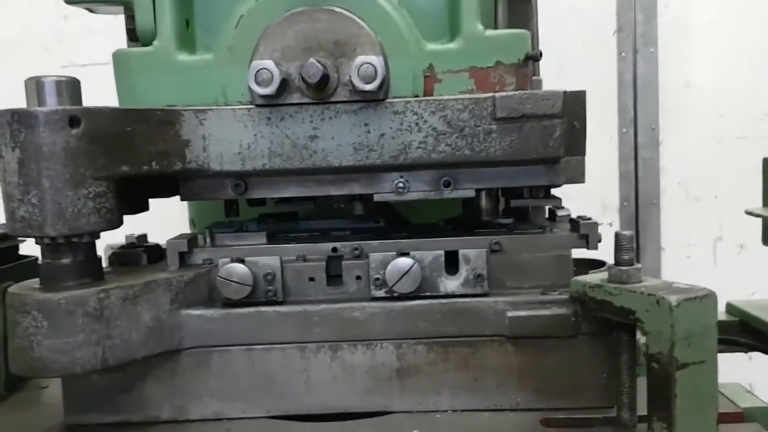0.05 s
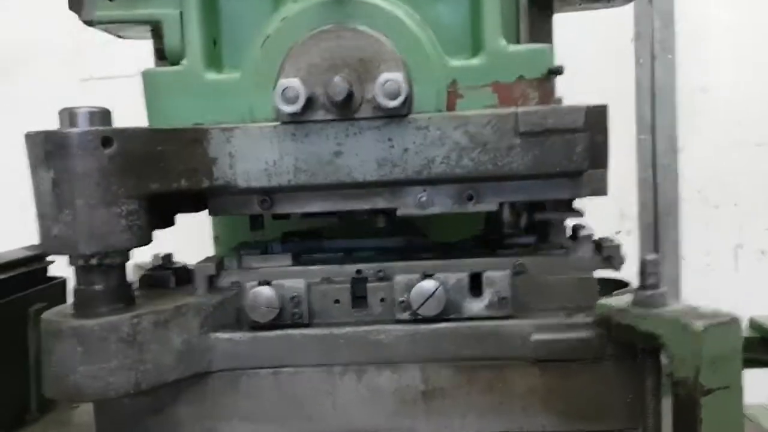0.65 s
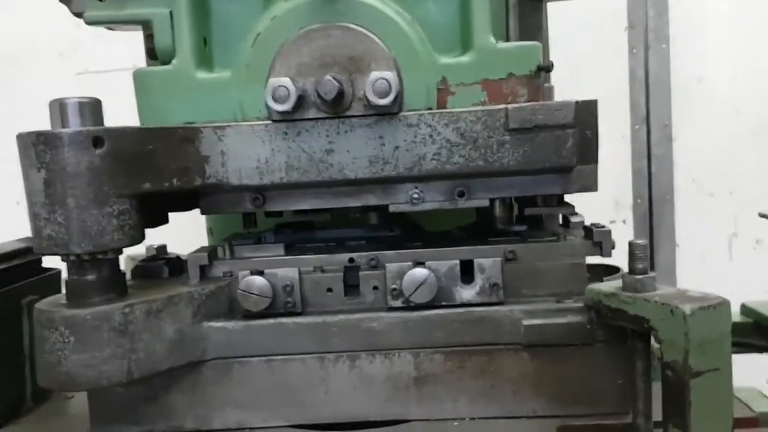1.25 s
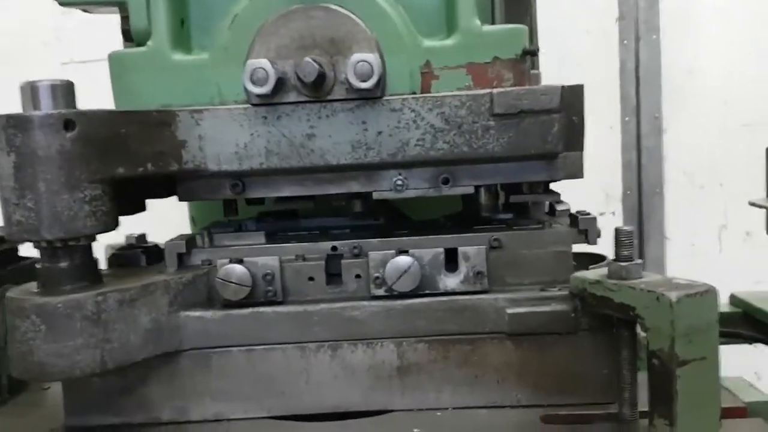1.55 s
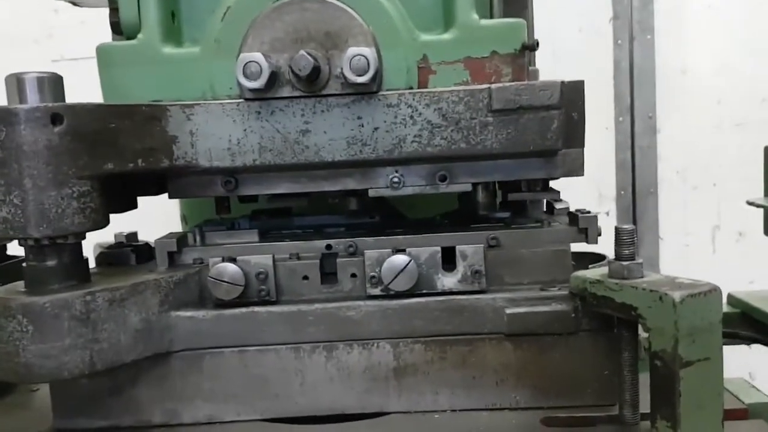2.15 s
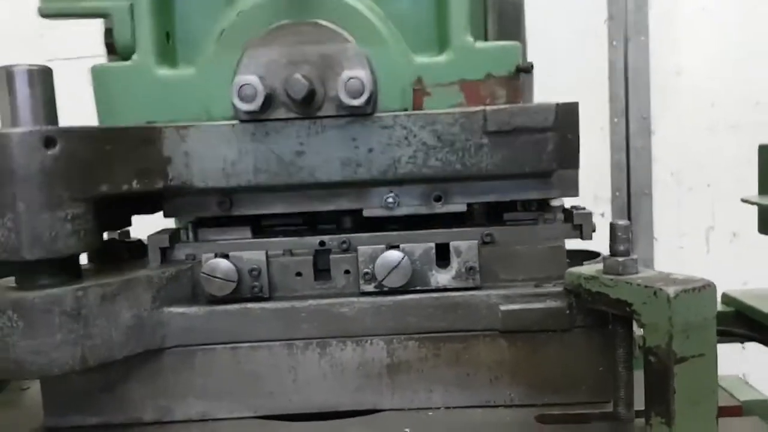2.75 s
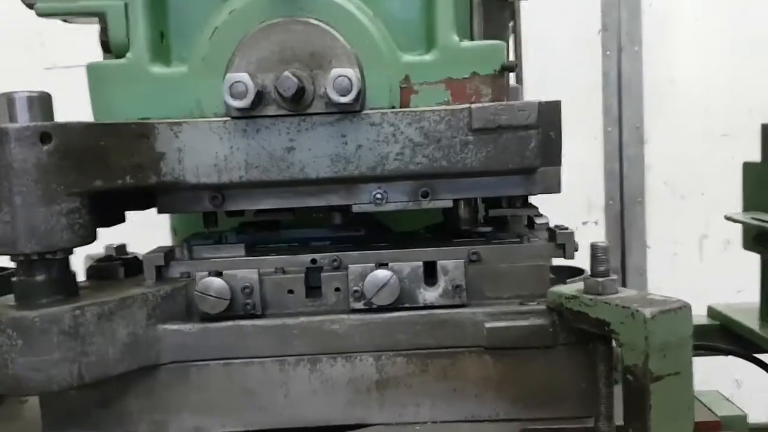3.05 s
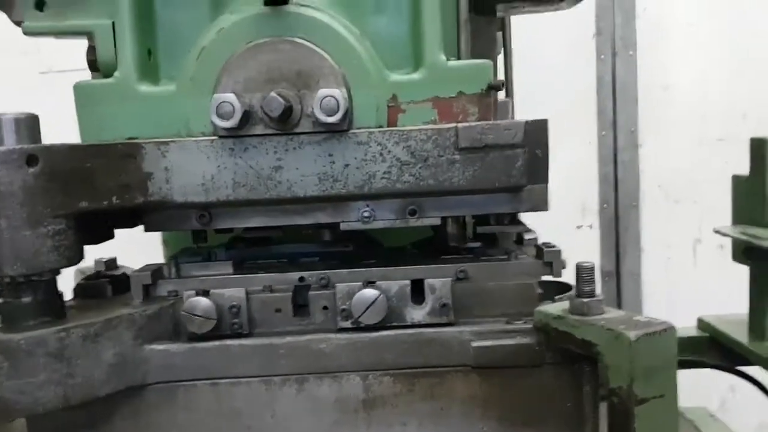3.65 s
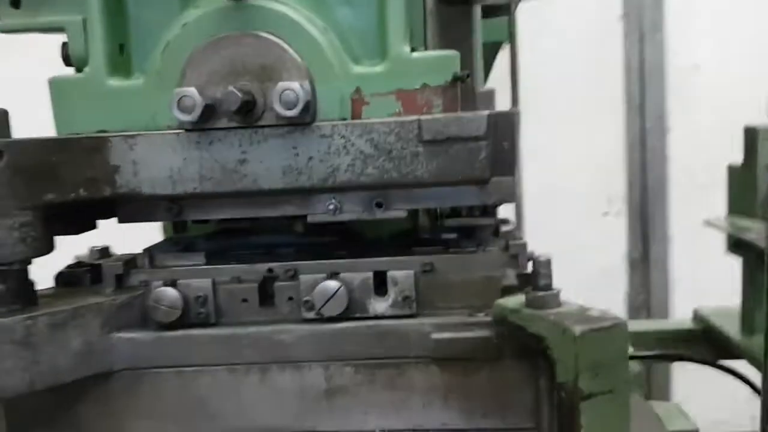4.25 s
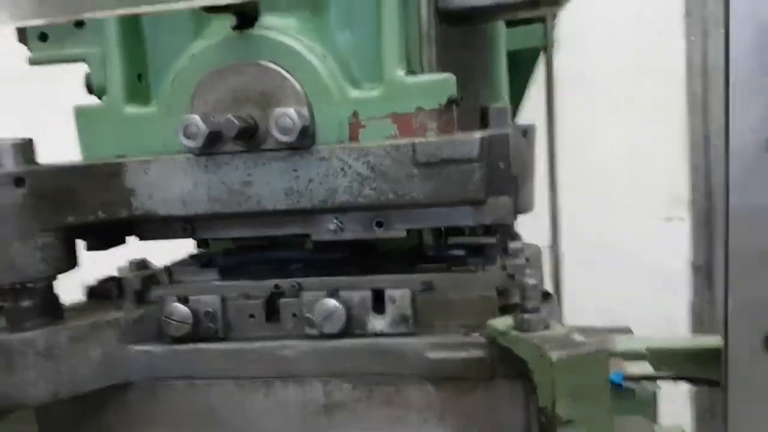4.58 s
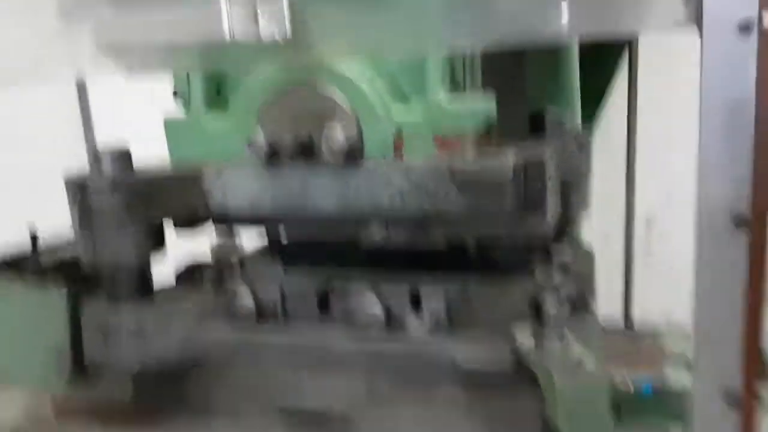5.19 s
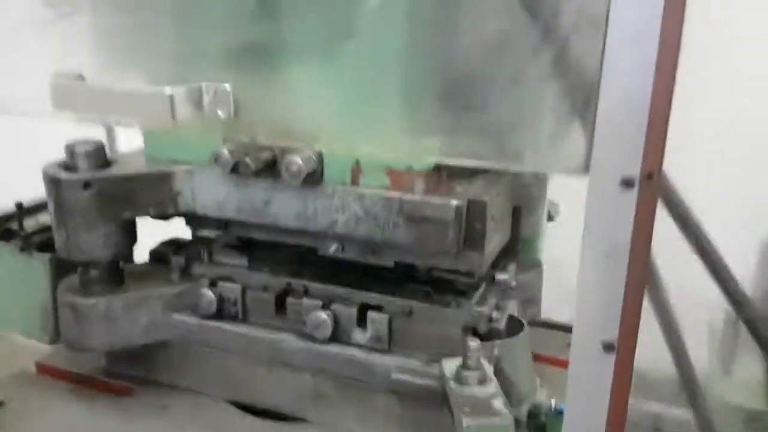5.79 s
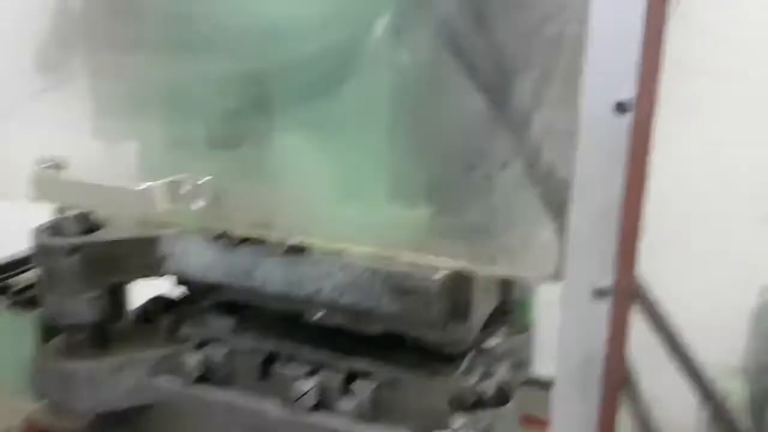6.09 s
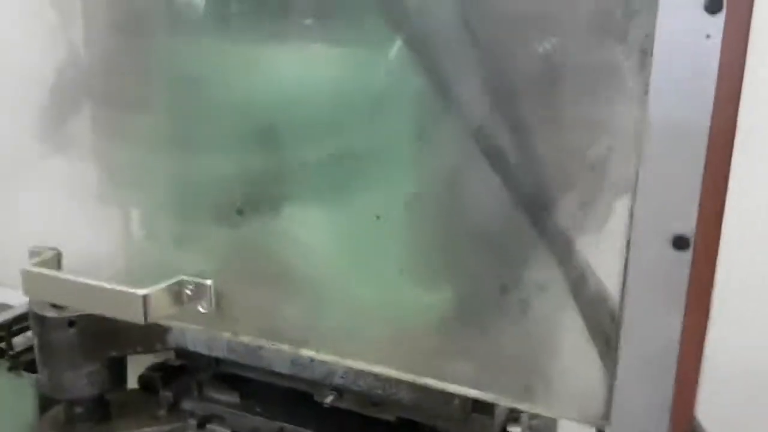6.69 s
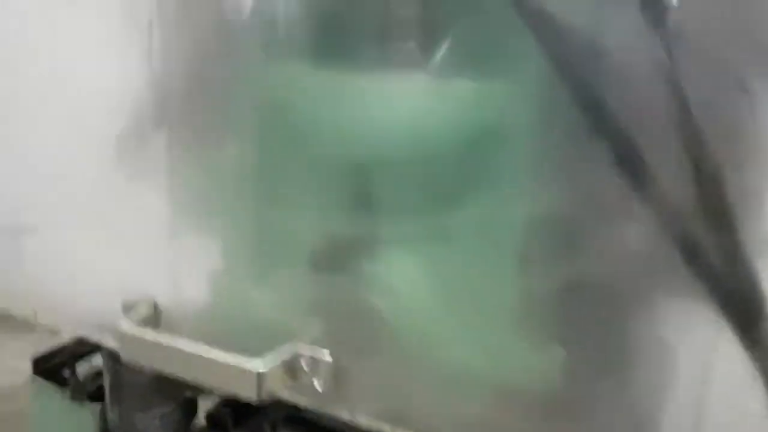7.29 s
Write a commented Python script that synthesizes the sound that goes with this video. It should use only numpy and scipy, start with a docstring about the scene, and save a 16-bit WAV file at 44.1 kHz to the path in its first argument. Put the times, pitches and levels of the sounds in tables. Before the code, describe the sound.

A stamping press makes two strokes close to the microphone in a hard-walled workshop. Each starts with a loud slam and a few heavy blows, then ends with a clink and a knock that leaves the steel ringing. Afterwards the machine idles with a steady hum and a quick, light ticking, while the guard clacks softly and a few dull thuds come from further off.

```python
"""Stamping press in a workshop

A flywheel press makes two strokes, close by, between hard walls. Each time the clutch bites,
the die slams shut, and at the top a pawl catches and the clutch knocks out, leaving the steel
ringing. Then the drive idles with a hum and a quick tick; the guard rattles and things thud
further off. Hits are noise bursts with a decaying tail; ringing steel is beating partials."""
import sys
import numpy as np
from scipy import signal
from scipy.fft import rfft, irfft, next_fast_len
from scipy.io import wavfile
from scipy.ndimage import uniform_filter1d, minimum_filter1d

SR = 44100
rng = np.random.default_rng(int(sys.argv[2]) if len(sys.argv) > 2 else 0)


def master(y):
    """Save y as 16-bit WAV."""
    cut = np.clip(np.atleast_2d(y).T, -1, 1)
    pcm = np.round(cut * 32767)  # scale
    wavfile.write(sys.argv[1], SR, pcm.astype(np.int16))


N = 332073
TIME = np.arange(3 * SR) / SR

# cues of each stroke: clutch bite t/s, die slam t/s, pawl t/s, clutch release t/s, die level/dB
STROKES = [(0.2138, 0.2356, 0.7365, 0.792, -13), (2.4956, 2.5787, 3.0728, 3.122, -9.5)]
# blows through the frame as the die closes: t/s, level/dB, tilt/(dB per octave)
BLOWS = [(0.233, -6, 1), (0.311, -10, 2.5), (0.388, -14.5, 2.5), (2.577, -6.5, 1.5), (2.615, -12, -3.5),
         (2.686, -11.5, 4), (2.744, -13.5, -2)]
# sharp knocks and clicks (latches, loose parts, a die rebound, the drive's louder ticks):
# t/s, level/dB, contact t60/s, tail/dB re contact, centre f/Hz
KNOCKS = [(0.311, -12.5, 0.078, -26, 1400), (2.347, -31.5, 0.03, -19, 2100), (2.353, -26.5, 0.13, -20, 760),
          (4.368, -24.5, 0.014, -41, 1610), (5.084, -25, 0.014, -28, 1880), (5.102, -30, 0.015, -39, 1800),
          (5.381, -33, 0.011, -40, 3540), (6.720, -33, 0.03, -22.5, 1950),
          (6.786, -36.5, 0.051, -18.5, 3520), (6.968, -45, .025, -19, 2200), (7.047, -35, 0.014, -21, 1400),
          (7.056, -24, .022, -22.5, 860), (7.077, -25, 0.011, -29, 1300), (7.330, -41, .025, -14, 2100)]
# dull thuds that set a panel booming: t/s, level/dB, boom level/dB, boom f/Hz
THUDS = [(4.772, -28.5, -28.5, 98), (4.9, -39, -32.5, 62.6), (6.111, -36, -29.5, 135),
         (6.215, -34.5, -34, 138.8)]
# small sharp ticks of steel: t/s, level/dB
SNICKS = [(0.3114, -30), (0.4651, -33), (0.55, -32.5), (0.6116, -38.5), (2.8, -34), (2.8854, -32),
          (4.7417, -41)]
# fader ride on the drive's tick: t/s, level/dB
TICK_RIDE = [(4.08, -44), (4.35, -46.5), (4.95, -39.5), (5.3, -41), (5.9, -42.5), (6.25, -38.5),
             (6.7, -38.5), (7.53, -39)]
# closeness to the motor: t/s, closeness/(0-1)
MOTOR_CLOSENESS = [(0, 0.6), (2, 0.18), (3.8, 0.6), (4.6, 0.82), (5.4, 0.95), (6.301, 1), (7.53, 0.94)]
# tones of the drive: f/Hz, far level/dB, close level/dB
HUM_TONES = [(100.1, -53, -54.5), (172.6, -58, -56.5), (201.4, -46, -69), (212.5, -44.5, -64),
             (299, -48, -46), (545, -43.5, -50.5), (561, -62, -58.5), (580, -78, -53), (654, -70, -63.5),
             (845, -68, -69), (1000, -54, -62), (1180, -73, -59.5), (1757, -66, -63)]

# modes of the struck steel parts: f/Hz, level/dB, t60/s
DIE_MODES = [(442.3, -4.5, 0.3), (580, 2, 0.045), (760, 6, 0.066), (1004, 0, 0.064), (1334, 2, .05)]
FRAME_MODES = [(164.4, -2, 1.6), (231, -8, 1.2), (257.7, -7, 1.33), (476.3, -6.5, 2.14),
               (594.4, -4.5, 0.92), (946, -4.5, 1.06), (1560, 2, 0.7), (1670, -19, 3.1)]
PAWL_MODES = [(1949, -21, 0.11), (2880, -26.5, 0.12)]
FLYWHEEL_MODES = [(173.5, -14.5, 7.3), (218.4, -18.5, 7), (467.6, -3.5, 1.53), (681, -7.5, 2),
                  (822, -14.5, 1.4), (986, -4.5, 1.3), (1145, -10, 1.3), (1420, -8, 1.7),
                  (1760, -15.5, 1.7), (2070, -12, 1.1), (2244, -7, 1.6), (2500, -10, 2.02),
                  (2814, -13, 1.7), (2880, -10, 1.2), (3198, -12, 1.4), (3693, -15.5, 1.54),
                  (3990, -17.5, 1.2), (4220, -11, 1.6), (4210, -9, 1.4), (4495, -14, 1.07),
                  (4673, -9.5, 1.33), (4915, -7.5, 0.93), (6500, -21, 1.04)]

# EQ curves of the press's hits and its after-ring: f/Hz, relative level/dB
BITE_EQ = [(50, -37), (130, -14.5), (300, -2.5), (600, 4.5), (1300, 3), (2600, 0), (3500, -6.5),
           (4800, -11.5), (6500, -25.5), (8500, -44.5), (12500, -31.5), (16000, -35)]
BLOW_EQ = [(30, -25), (80, -14.5), (150, 4.5), (260, 5), (400, -2.5), (650, -5), (1100, -14.5),
           (1700, -11.5), (3000, -38), (5000, -47), (8500, -73), (14000, -67)]
PAWL_EQ = [(200, -18), (900, 0.5), (1500, -5), (1950, 1.5), (2400, -2), (2900, 0.5), (3600, -11),
           (5500, -13), (7000, -23), (8500, -44), (13000, -26), (16000, -33)]
RELEASE_EQ = [(29, -54), (50, -32), (144, -11.5), (277, 0), (361, -12.5), (692, -6), (860, -2.5), (924, -6),
              (2310, -5), (3400, -18), (4330, -11.5), (6680, -29), (8500, -45), (12500, -34), (15900, -44)]
RING_EQ = [(50, -49), (110, -15.5), (160, 3), (330, -4), (480, 3), (1000, 1), (1800, 0), (2700, -2),
           (3400, -9.5), (4300, -3.5), (5000, -7), (5700, -19), (7000, -20), (8600, -36.5), (13000, -19),
           (16000, -21)]
# EQ curves of the small hits: f/Hz, relative level/dB
GUARD_EQ = [(300, -10), (900, -7), (1300, 1), (1850, 0.5), (2250, -4), (2650, -1.5), (3200, -8),
            (4600, -13.5), (6500, -20), (8500, -43), (12500, -23), (16000, -20)]
KNOCK_TREBLE_EQ = [(3000, 10), (4500, 8.5), (6500, 1.5), (8500, -25), (13000, -21), (16000, -5)]
THUD_EQ = [(22, -14), (42, -4), (75, -3), (120, -1), (200, -1.5), (320, -7.5), (800, -15), (1500, -19.5),
           (4000, -39), (9000, -74)]
SNICK_EQ = [(1000, 2), (4500, 2.5), (6500, -3.5), (8500, -23.5), (13000, -5), (16000, -9)]
TICK_EQ = [(500, 1.5), (1900, 15), (3000, 2.5), (3800, 3), (4300, 4.5), (4700, 5), (5400, -4),
           (7000, -10.5), (8500, -32), (13000, -27.5), (16000, -17)]
# EQ curves of the beds, motor housing and workshop air: f/Hz, relative level/dB
WHIRR_EQ = [(300, -10), (470, -0.5), (700, -4), (980, -10), (1100, -6), (1200, 3), (1380, -16), (1600, 0.5),
            (1900, 5), (2150, 4), (2400, 2.5), (3100, -12), (4500, -11), (8000, -40.5)]
AIR_EQ = [(25, -16), (60, -6), (110, 0), (210, 4.5), (380, -9), (520, 0.5), (700, -10), (1050, -6.5),
          (1450, -16.5), (2300, -17), (4500, -31.5), (8500, -49.5), (13000, -43.5), (16000, -40)]

# decay of the hall and of the drive's dense ringing: f/Hz, t60/s
HALL_DECAY = [(80, 1.3), (200, 1.32), (600, 1.54), (1500, 1.26), (3000, 1.28), (5000, 1.2), (8000, 1.42),
              (14000, 0.89)]
RING_DECAY = [(100, 2.2), (200, 2.7), (600, 1.55), (1500, 1.75), (3000, 1.7), (4800, 1.42), (7000, 0.86),
              (10000, 0.57), (15000, 0.25)]
# likeness of the two ears: f/Hz, correlation/(0-1)
EAR_LIKENESS = [(100, 0.96), (200, 0.95), (350, 0.88), (700, 0.5), (1300, 0), (4000, 0), (12000, 0.29)]
# stereo lean: f/Hz, left minus right level/dB
BALANCE = [(100, -2), (200, -2.5), (600, -0.5), (1400, -0.4), (2800, 1.5), (4600, -2.5), (8000, 1),
           (13000, 0.5)]


def downstroke():
    """The clutch bites, then the die slams shut and shakes the frame."""
    out = np.zeros((2, N))
    for bite_s, slam_s, _, _, slam_db in STROKES:
        out += strike(bite_s, BITE_EQ, db=-7, t60=0.14, tail_db=-8, rise_s=0.0017)
        add(out, slam_s, amp(slam_db) * ring(DIE_MODES, split=0.079))
    for s, db, tilt_db in BLOWS:
        out += strike(s, BLOW_EQ, db, t60=0.12, tail_db=-13, rise_s=0.0015, tilt_db=tilt_db)
        add(out, s, amp(db - 20) * ring(FRAME_MODES, split=0.00743))
    return out


def upstroke(release_db=-7):
    """The pawl catches with a clink, the clutch knocks out, and the flywheel rings on."""
    out, knocks, ringing = np.zeros((3, 2, N))
    for _, _, pawl_s, release_s, _ in STROKES:
        out += strike(pawl_s, PAWL_EQ, db=-16.5, t60=0.078, tail_db=-10, rise_s=0.0034)
        add(out, pawl_s, ring(PAWL_MODES, split=0.019))
        add(knocks, release_s, amp(release_db) * contact(t60=0.15, rise_s=0.0024))
        add(ringing, release_s, amp(release_db - 11.5) * tail(RING_DECAY, build_s=0.0099))
        add(out, release_s, amp(release_db - 19) * ring(FLYWHEEL_MODES, split=0.007, count=4))
    out += colour(knocks, RELEASE_EQ, ragged_db=3, apart_hz=90)
    return out + colour(ringing, RING_EQ, ragged_db=4, apart_hz=22)


def knocks_and_clicks(width_octaves=0.69):
    """The guard is pulled and clacks; sharp knocks and clicks each sound one broad resonance."""
    out = strike(4.769, GUARD_EQ, db=-24.5, t60=0.05, tail_db=-12.5, rise_s=0.0011)
    hz = np.geomspace(20, SR / 2, num=60)
    for s, db, t60, tail_db, centre_hz in KNOCKS:
        skirt_db = -30 * np.log10(1 + (np.log2(hz / centre_hz) / width_octaves) ** 2 / 2)
        eq = np.transpose([hz, read(KNOCK_TREBLE_EQ, hz) + skirt_db])
        out += strike(s, eq, db, t60, tail_db, rise_s=0.00052)
    return out


def thuds(swell_s=0.031):
    """Heavy, soft-edged hits further off, each swelling into a panel's boom."""
    out = np.zeros((2, N))
    for s, db, boom_db, boom_hz in THUDS:
        out += strike(s, THUD_EQ, db, t60=0.21, tail_db=-2.5, rise_s=0.0092)
        boom = ring([(boom_hz, boom_db, 0.88)], split=0.046, count=3)
        add(out, s, boom * (1 - np.exp(-TIME / swell_s)))
    return out


def snicks():
    """Light touches of steel on steel, bright and dry."""
    out = np.zeros((2, N))
    for s, db in SNICKS:
        add(out, s, amp(db) * colour(contact(t60=0.04, rise_s=0.00066), SNICK_EQ))
    return out


def ticking(first_s=4.0788, turn_s=0.06018, jitter_s=0.0008, scatter_db=2.1):
    """The drive scuffs once a turn, a little different in timing, strength and ring each time."""
    out = np.zeros((2, N))
    for s in np.arange(first_s, N / SR, turn_s):
        late, strong = rng.standard_normal(2)
        db = np.interp(s, *np.transpose(TICK_RIDE)) + scatter_db * strong
        scuff = amp(db) * contact(t60=0.037, rise_s=0.0007)[:, :SR // 10]
        add(out, s + jitter_s * late, colour(scuff, TICK_EQ, ragged_db=2, apart_hz=260, size=2048))
    return out


def motor(waver_db=1.0, wobble_hz=0.32):
    """The housing whirrs and the drive hums; the blend shifts with closeness to the motor."""
    near = np.interp(np.arange(N) / SR, *np.transpose(MOTOR_CLOSENESS))
    whirr = colour(hiss(next_fast_len(N))[:, :N], WHIRR_EQ, ragged_db=2.5, apart_hz=40)
    out = amp(-54) * near * whirr
    for hz, far_db, near_db in HUM_TONES:
        cycles = np.cumsum(hz + wobble_hz * drift(6.6)) / SR + rng.random()
        db = far_db + (near_db - far_db) * near + waver_db * drift(5)
        out += np.sqrt(2) * amp(db) * np.sin(2 * np.pi * cycles + ear_phase(hz))
    return out


def room_tone():
    """Workshop air: a dark noise bed whose level wavers slightly."""
    return amp(-43 + 0.94 * drift(5)) * colour(hiss(next_fast_len(N))[:, :N], AIR_EQ)


def strike(s, eq, db, t60, tail_db, rise_s, tilt_db=0):
    """One contact at s seconds and the hall's answer to it, through the same EQ."""
    hit = amp(tail_db) * tail(HALL_DECAY, build_s=0.008)
    add(hit, 0, contact(t60, rise_s))
    out = np.zeros((2, N))
    add(out, s, amp(db) * colour(hit, eq, tilt_db, ragged_db=2, apart_hz=110))
    return out


def contact(t60, rise_s):
    """Steel chatters on steel: a noise burst that swells quickly and dies."""
    t = TIME[:SR // 2]
    attack = 1 - np.exp(-(t / rise_s) ** 2)
    return hiss(len(t)) * amp(-60 * t / t60) * attack


def ring(modes, split, count=2, rise_s=0.00057):
    """Struck modes, each a cluster of beating partials detuned by up to the fraction split."""
    out = np.zeros((2, len(TIME)))
    for hz, db, t60 in modes:
        fade = amp(db - 60 * TIME / t60) * np.sqrt(2 / count)
        for k in range(count):
            detune = split * (2 * (k + rng.random()) / count - 1)
            phase = 2 * np.pi * rng.random() + (-1) ** k * ear_phase(hz)
            out += fade * np.cos(2 * np.pi * hz * (1 + detune) * TIME + phase)
    return out * (1 - np.exp(-TIME / rise_s))


def tail(decay, build_s):
    """A wash of countless modes and echoes, each band dying at its own speed."""
    hz, t, bands = signal.stft(hiss(2 * SR), SR, nperseg=256)
    fade = amp(-60 * t / read(decay, hz)[:, None])
    _, wash = signal.istft(bands * fade, SR, nperseg=256)
    return wash[:, :2 * SR] * (1 - np.exp(-TIME[:2 * SR] / build_s))


def colour(x, eq, tilt_db=0, ragged_db=0, apart_hz=200, size=8192):
    """A unit-power EQ, tilted per octave and roughened by chance resonances."""
    hz = abs(np.fft.fftfreq(size, 1 / SR))
    knots = np.arange(0, SR, apart_hz)
    ripple = np.interp(hz, knots, rng.standard_normal(size)[:len(knots)])
    ripple *= hz / (hz + 1500)  # the bass stays smooth
    gain = amp(read(eq, hz) + ragged_db * ripple + tilt_db * np.log2(np.maximum(hz, 200)))
    minimum_phase = np.exp(np.conj(signal.hilbert(np.log(gain))))  # no ringing ahead of a hit
    taps = np.fft.ifft(minimum_phase).real[:size // 2]
    return signal.oaconvolve(x, taps[None] / np.linalg.norm(taps), axes=1)[:, :x.shape[1]]


def hiss(count):
    """Stereo white noise: centred in the bass, wide in the treble."""
    left, other = rfft(rng.standard_normal((2, count)))
    same = np.clip(read(EAR_LIKENESS, np.fft.rfftfreq(count, 1 / SR)), -1, 1)
    right = same * left + np.sqrt(1 - same ** 2) * other
    return irfft([left, right], count)


def ear_phase(hz):
    """Left and right phase offsets that give a tone its width."""
    return np.array([[0], [np.arccos(np.clip(read(EAR_LIKENESS, hz), 0, 1))]])


def drift(top_hz):
    """A random wander of rms 1, summed from twelve slow sines."""
    hz = top_hz * rng.uniform(0.1, 1, (12, 1))
    t = np.arange(0, N, 200) / SR
    wave = np.sin(2 * np.pi * (hz * t + rng.random(hz.shape))).sum(0)
    return np.interp(np.arange(N) / SR, t, wave / wave.std())


def amp(db):
    """Decibels to gain."""
    return 10 ** (np.asarray(db) / 20)


def read(curve, hz):
    """A curve's value on a log-frequency axis."""
    f, value = np.transpose(curve)
    return np.interp(np.log(hz + 1), np.log(f + 1), value)


def add(mix, s, sound):
    """Lays a sound into the mix at s seconds."""
    part = mix[:, round(s * SR):][:, :sound.shape[1]]
    part += sound[:, :part.shape[1]]


def limit(x, ceiling, hold_s=0.0018):
    """Ducks the gain smoothly round each peak above the ceiling."""
    width = round(hold_s * SR)
    gain = np.minimum(1, ceiling / (abs(x).max(0) + 1e-9))
    return x * uniform_filter1d(minimum_filter1d(gain, 2 * width), width)


def scene():
    """The press up front, small hits around it, the running drive and the air underneath."""
    press = downstroke() + upstroke()
    small_hits = knocks_and_clicks() + thuds() + snicks()
    return press + small_hits + room_tone() + motor() + ticking()


def record(dry):
    """Each microphone has its own colour; a limiter holds the peaks; a low-pass trims the top."""
    size = next_fast_len(N + SR)
    lean_db = read(BALANCE, np.fft.rfftfreq(size, 1 / SR)) * np.array([[0.5], [-0.5]])
    coloured = irfft(rfft(dry, size) * amp(lean_db), size)[:, :N]
    low_pass = signal.firwin(511, cutoff=15950, window=("kaiser", 9), fs=SR)
    return signal.oaconvolve(limit(coloured, ceiling=0.95), low_pass[None], "same")


dry = scene()
out = record(dry)
master(out)
```